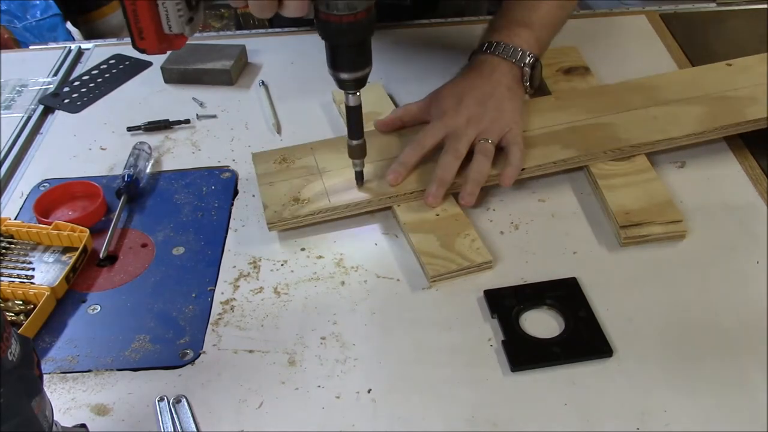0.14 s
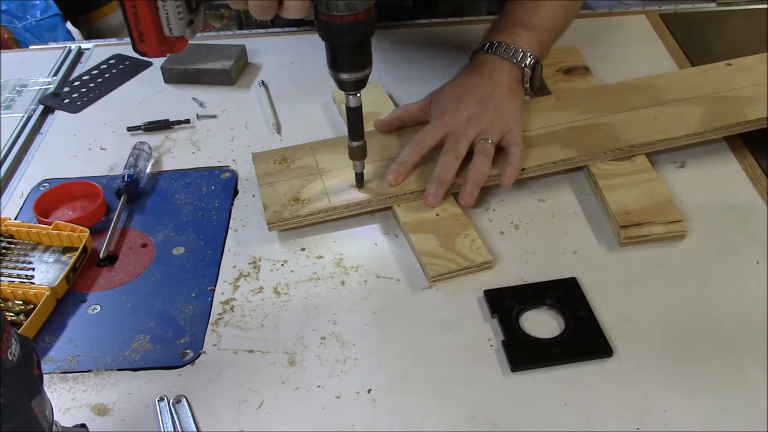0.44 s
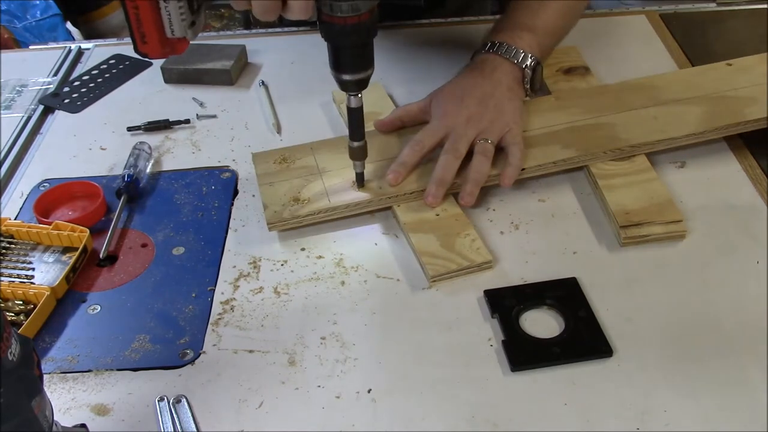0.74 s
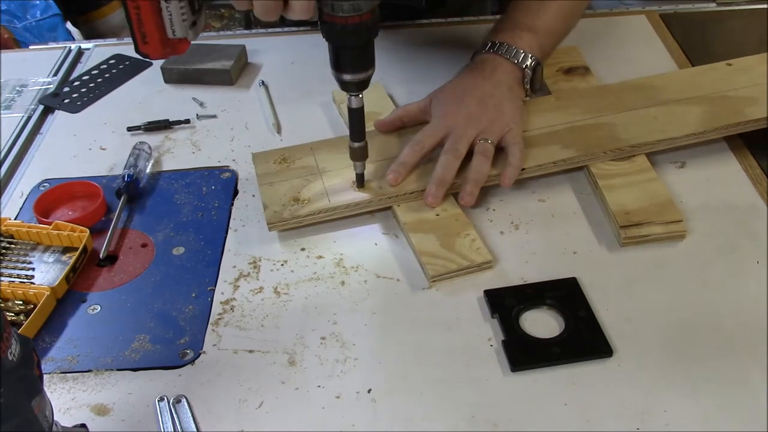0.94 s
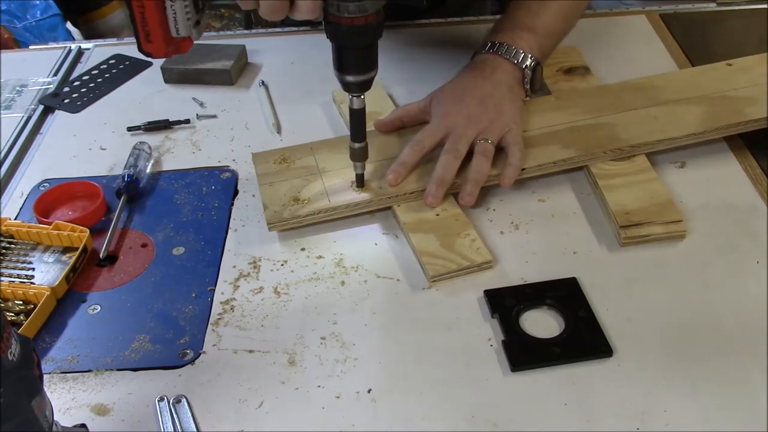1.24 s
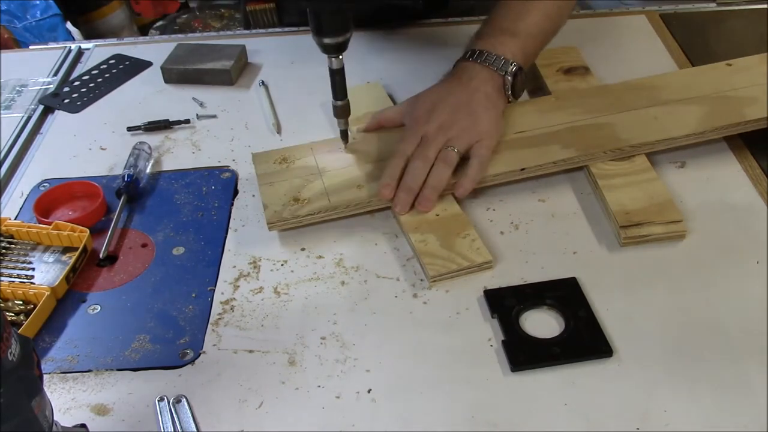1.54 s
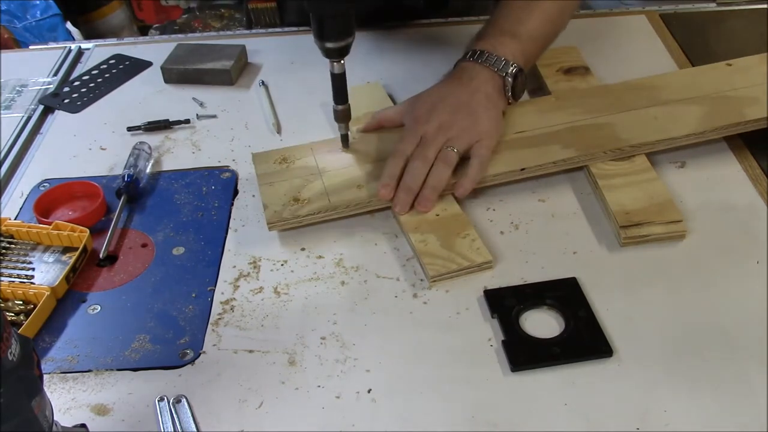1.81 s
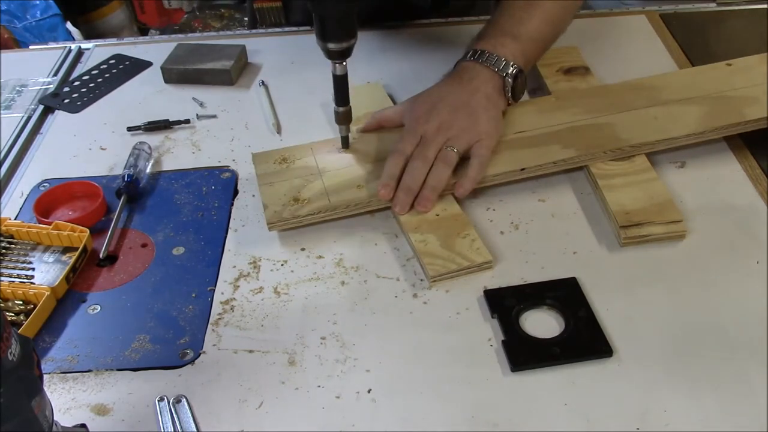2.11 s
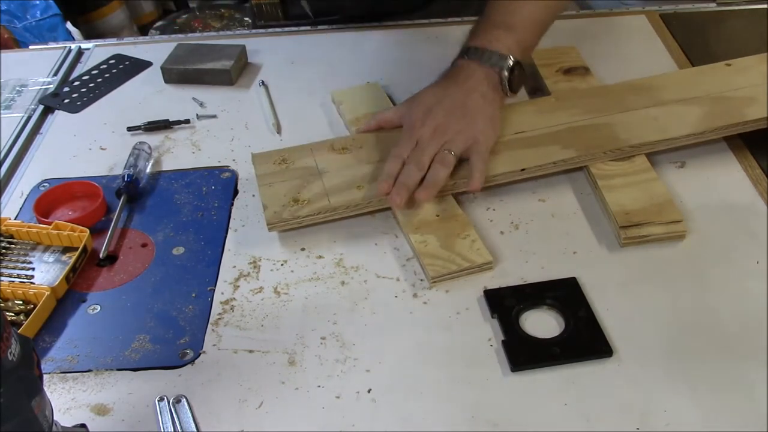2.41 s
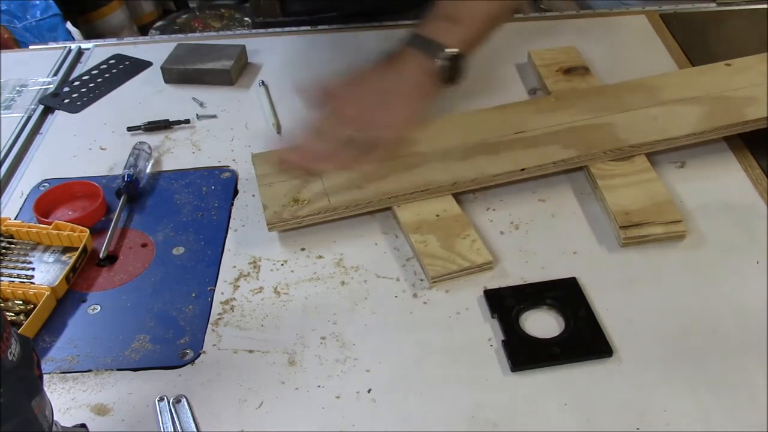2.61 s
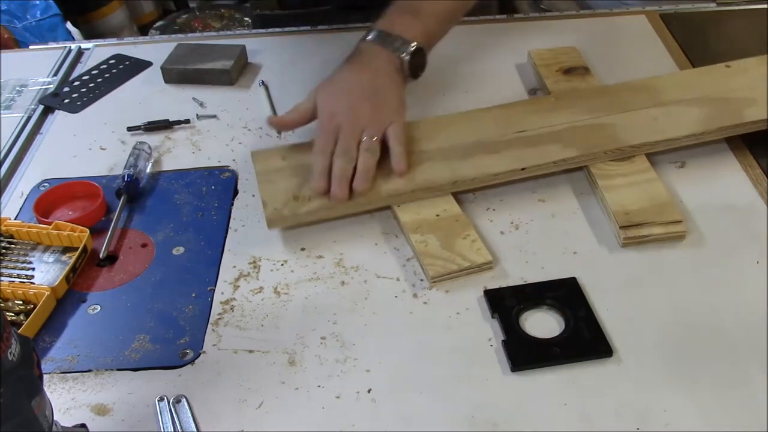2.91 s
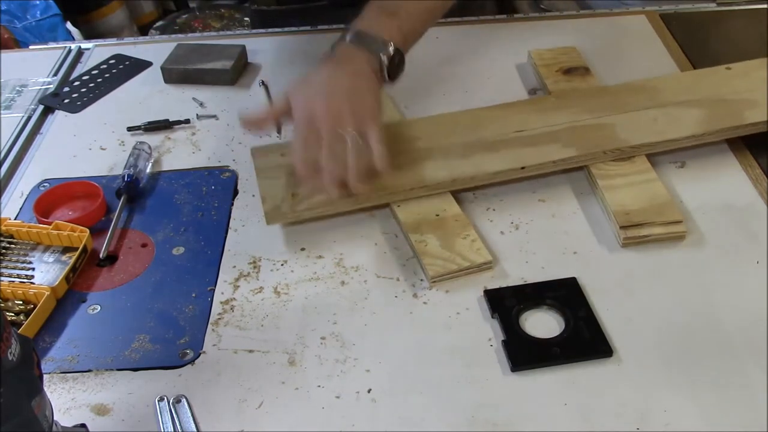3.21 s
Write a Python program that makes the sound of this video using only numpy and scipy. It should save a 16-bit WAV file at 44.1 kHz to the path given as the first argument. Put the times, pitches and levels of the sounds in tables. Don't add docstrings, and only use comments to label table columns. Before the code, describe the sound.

A cordless drill whines close by, bogging slightly as it cuts wood, stops with a chirp, and abruptly runs again. Then a board slides, is brushed by hand and knocks on a bench in a reverberant garage.

```python
import sys
import numpy as np
from scipy import signal
from scipy.fft import rfft, irfft, next_fast_len
from scipy.io import wavfile
from scipy.ndimage import uniform_filter1d, map_coordinates

SR = 44100
rng = np.random.default_rng(int(sys.argv[2]) if len(sys.argv) > 2 else 0)


def gain_from_decibels(decibels):
    exponent = np.asarray(decibels, float) / 20
    return 10 ** exponent


def log_audio(samples):
    frames = np.atleast_2d(samples).T
    limited = np.clip(frames, -1, 1)
    pcm = np.round(limited * 32767).astype(np.int16)
    wavfile.write(sys.argv[1], SR, pcm)


N = 147735


def unit(x):
    return x / np.sqrt(np.mean(x ** 2) + 1e-20)


def along(points, hz):
    f, v = np.transpose(points)
    return np.interp(np.log(hz + 1), np.log(f + 1), v)


def wobble(rate_hz):
    knots = rng.standard_normal(int(N * rate_hz / SR) + 4)
    return map_coordinates(knots, [np.arange(N) * rate_hz / SR])


def filtered(x, response):
    m = next_fast_len(N + SR // 2)
    return irfft(rfft(x, m) * response(np.fft.rfftfreq(m, 1 / SR)), m)[..., :N]


def peaks(table):
    def response(f):
        return sum((-1) ** k * gain_from_decibels(db) * 1j * f * width / (hz * hz - f * f + 1j * f * width)
                   for k, (hz, width, db) in enumerate(table))
    return response


def above(x, hz):
    return signal.sosfilt(signal.butter(4, hz, "high", fs=SR, output="sos"), x)


def struck(hits, modes, attack_s, crack_db=-99):
    out, t = np.zeros(N + SR), np.arange(SR // 4) / SR
    for s, db in hits:
        ring = sum(gain_from_decibels(level + rng.normal(0, 1.5) - 60 * t / t60) * np.sin(2 * np.pi * hz * t)
                   for hz, level, t60 in modes)
        crack = gain_from_decibels(crack_db - 60 * t / 0.0076) * rng.standard_normal(len(t))
        out[round(s * SR):][:len(t)] += gain_from_decibels(db) * (ring * (1 - np.exp(-t / attack_s)) + crack)
    return out[:N]


SAG, SAG_S, JITTER_HZ = .07, .014, 0.83
STRAIN_HZ, STRAIN_SHAKE = 1272.4, .15


def shaft_speed(set_hz, stop_s):
    sag = SAG * np.clip(1 + (np.arange(N) / SR - stop_s) / SAG_S, 0, 1)
    speed_hz = uniform_filter1d(set_hz, size=1800) * (1 - sag) + JITTER_HZ * wobble(60)
    return speed_hz + STRAIN_SHAKE * np.clip(STRAIN_HZ - set_hz, 0, None) * wobble(45)


SHAFT_ORDERS = [3, 4, 5, 8, 9, 10, 10.17, 11.8, 12, 20, 24, 28, 31.8, 36, 39.7, 40, 41, 44, 45, 46]
# level/dB, change where bench echo meets direct sound/dB, growth/(dB per dB load), flutter/dB
WHINE_ORDERS = [(-70.5, -0.5, 1, 3), (-51.5, -7, -0.1022, 1.32), (-64.5, 0.5, 2.5, 4),
                (-44, -2.5, -0.0229, 2), (-53.5, 0.5, 2.24, -1.5), (-56, 1, -0.22, 3), (-61, 0, 1.53, 7.5),
                (-61, -0.5, 0.5, 3.5), (-48, 2, 0.38, 1.63), (-55.5, 1.47, 0.1, 1.5),
                (-63.5, 0.2, -0.6, 4.5), (-60, 2.82, 0.25, 5), (-57.5, -1.02, 0.35, 4),
                (-65.5, 0.27, 1.04, 1.5), (-61, -9, 2.9, -1), (-45.5, -6.5, 0.32, 3), (-64.5, -4.4, 0, 2),
                (-61, 0.52, 5.26, 4), (-62.5, 2.65, -0.35, -0.5), (-63, 2.4, 4.28, -1)]
ECHO_HZ, ECHO_WIDE_HZ, FLUTTER_RATE_HZ = 1283.9, 13.56, 85
DRIFT_DB, DRIFT_RATE_HZ, GRIP_TOP_ORDER = 0.793, 14, 8.5
BLUR, BLUR_SHARE = 0.0051, .7
BOG_HZ, BOG_DB_PER_HZ, WHINE_ENDS_S = 1262.1, 0.57, 0.0088


def gear_whine(speed_hz, turns, load_db, grip_db, stop_s):
    t = np.arange(N) / SR
    shake = BLUR_SHARE * wobble(250)
    echo = np.exp(-((speed_hz - ECHO_HZ) / ECHO_WIDE_HZ) ** 2) * np.clip((load_db + 54.5) / 6, 0, 1)
    whine = np.zeros(N)
    for order, (db, echo_db, grows, flutter_db) in zip(SHAFT_ORDERS, WHINE_ORDERS):
        level_db = db + 2.5 + (order < GRIP_TOP_ORDER) * grip_db + DRIFT_DB * wobble(DRIFT_RATE_HZ)
        level_db = level_db + echo_db * echo + grows * (load_db + 44)
        level_db = level_db + flutter_db * wobble(FLUTTER_RATE_HZ)
        phase = 2 * np.pi * (order * turns / 4 + rng.random()) + BLUR * order * flutter_db * shake
        whine += gain_from_decibels(level_db) * np.sin(phase)
    bog_db = BOG_DB_PER_HZ * np.clip(BOG_HZ - speed_hz, 0, None) * (t < stop_s - SAG_S)
    return whine * gain_from_decibels(-bog_db) * np.clip((stop_s - t) / WHINE_ENDS_S - .5, 0, 1)


# f/Hz, density/(dB per Hz)
FAN_SPECTRUM = [(180, -33.5), (300, -35), (1190, -11.5), (1290, -8), (1770, -23.5), (2550, -7), (4870, -12),
                (6670, -6), (15800, -12.5)]
# f/Hz, width/Hz, level/dB
CASING_MODES = [(6600, 1100, -1.5), (8580, 727, -2), (14340, 3070, 4.5)]


def fan_rush(gate):
    return unit(filtered(gate * rng.standard_normal(N),
                         lambda f: gain_from_decibels(along(FAN_SPECTRUM, f)) * (1 + np.abs(peaks(CASING_MODES)(f)))))


# f/Hz, width/Hz, level/dB
GEAR_MODES = [(1520, 466, -10), (2772, 490, -3), (3125, 402, 2.5), (3835, 1162, -5)]


def gear_grind(gate):
    rough = gate * rng.standard_normal(N) * gain_from_decibels(1.19 * wobble(90))
    return unit(filtered(rough, lambda f: peaks(GEAR_MODES)(f) ** 2))


GEARING, FLUTE_HZ, FLUTE_WIDE_HZ, BITE_SCATTER_DB, SHAVING = 27, 574, 163, 4.5, 1


def flute_chatter(turns):
    bites = np.diff(np.floor(turns / GEARING), prepend=0) * gain_from_decibels(BITE_SCATTER_DB * rng.standard_normal(N))
    cut = unit(bites) + SHAVING * rng.standard_normal(N)
    return unit(filtered(cut, lambda f: peaks([(FLUTE_HZ, FLUTE_WIDE_HZ, 0)])(f) ** 2))


BRAKE_FROM_HZ, BRAKE_TO_HZ, LUMP_S = 5500, 2200, .0035


def brake_chirp(braking, rush, grind):
    t = np.arange(N) / SR
    end_s, brake_s, brake_db, lumpy = braking
    u = (t - end_s) / brake_s + 1
    sweep = 2 * np.pi * brake_s * (BRAKE_FROM_HZ * u + (BRAKE_TO_HZ - BRAKE_FROM_HZ) * u * u / 2)
    lumps = 1 - np.clip(lumpy, 0, 1) * np.sin(np.pi * (t - end_s + 0.00295) / LUMP_S) ** 2
    swell = np.sin(np.pi * np.clip(u, 0, 1) ** 2)
    return gain_from_decibels(brake_db) * lumps * swell * (np.sin(sweep) + .2 * rush + .25 * grind)


GATED, RUSH_DB, FLUTE_DB, IDLE_HZ, IDLE_GROWS = 0.153, -40.5, -67, 2244, 0.29
COAST_DB, COAST_T60_S = -43.5, 0.083


def drill(rows, stop_s, braking):
    t = np.arange(N) / SR
    s, hz, load, grip = np.transpose(rows)
    load_db = np.interp(t, s, load)
    speed_hz = shaft_speed(np.interp(t, s, hz), stop_s)
    turns = np.cumsum(speed_hz) / SR
    whine = gear_whine(speed_hz, turns, load_db, np.interp(t, s, grip), stop_s)
    gate = 1 + GATED * np.cos(2 * np.pi * turns / 4)
    rush, grind = fan_rush(gate), gear_grind(gate)
    brake = brake_chirp(braking, rush, grind)
    running = np.clip((stop_s - t) / .004, 0, 1)
    chatter_db = FLUTE_DB + 0.42 * (load_db + 48.5)
    cutting = gain_from_decibels(load_db - 2.0) * grind + gain_from_decibels(chatter_db) * flute_chatter(turns)
    coast_db = COAST_DB - 60 * np.abs(t - stop_s) / COAST_T60_S + 3.3 * wobble(160)
    coast = gain_from_decibels(coast_db) * (1 - running) * grind
    low_rush = rush - filtered(rush, lambda f: f > IDLE_HZ)
    rush = rush + (gain_from_decibels(IDLE_GROWS * (load_db + 43.5)) - 1) * low_rush
    return whine, running * (gain_from_decibels(RUSH_DB + 0.34 * wobble(7.88)) * rush + cutting) + brake + coast


# t/s, peak level/dB
BIT_TOUCHES = [
    (1.389, -41.5),
    (1.526, -43),
    (2.361, -31.5),
]
# t/s, level/dB
GEAR_RATTLES = [(1.4385, -34), (1.442, -32), (1.4575, -43.5), (1.472, -59.5), (2.411, -32.5),
                (2.419, -42.5), (2.432, -41), (2.464, -47)]


def clicks():
    touches = struck(BIT_TOUCHES, [(FLUTE_HZ, 0, .045), (500, -5, .04), (800, -12, .03)], 0.006)
    gear_modes = [(3320, -13.5, .012), (2437, 0, 0.0195), (14900, -1.5, 0.0157)]
    return touches + struck(GEAR_RATTLES, gear_modes, 0.0004, crack_db=-19)


# t/s, effort level/dB
STROKE_EFFORTS = [
    [(2.469, -49), (2.51, -45), (2.55, -41.5), (2.625, -40), (2.645, -36.5), (2.664, -45), (2.686, -40),
     (2.697, -49)],
    [(2.741, -61.5), (2.748, -50.5), (2.762, -58), (2.788, -50.5), (2.8, -65)],
    [(2.936, -53), (2.955, -40), (2.972, -34), (3.0, -33.5), (3.033, -35.5), (3.048, -43.5)],
    [(3.246, -73), (3.252, -39), (3.284, -33.5), (3.295, -28), (3.338, -33), (3.35, -29.5)],
]
# hiss level/dB, bench weight level/dB
STROKE_TONES = [(6.5, -39.5), (6.5, -11), (3.5, -9.5), (2.5, -4)]
# f/Hz, density/(dB per Hz)
RUB_SPECTRUM = [(120, -45.5), (200, -31), (788, -11), (999, -10.5), (1220, -9.5), (1930, -5), (2890, -4),
                (4390, -9), (15800, -28.5)]
# f/Hz, width/Hz, level/dB
BOARD_MODES = [(1050, 178, 0.5), (1740, 34, -28), (3253, 37, -2.5), (3698, 92, 4.5), (4516, 274, 2.5),
               (5849, 150, 2.5)]
# f/Hz, width/Hz, level/dB
DRAG_MODES = [(299.6, 136, -1), (406, 130, 1), (581, 442, -2.5)]
BRIGHT_GROWS, BRIGHT_HZ, GRIT_DB, GRIT_RATE_HZ = 0.4, 6630, 1, 2500


def strokes():
    t = np.arange(N) / SR
    grit = rng.standard_normal(N) * gain_from_decibels(GRIT_DB * wobble(GRIT_RATE_HZ) + 0.99 * wobble(120))
    rub = unit(filtered(grit, lambda f: gain_from_decibels(along(RUB_SPECTRUM, f))
                        * (1 + 1.265 * np.abs(peaks(BOARD_MODES)(f)))))
    bright = filtered(rub, lambda f: 1 / (1 + (BRIGHT_HZ / (f + 1)) ** 6))
    drag = unit(filtered(rng.standard_normal(N) * gain_from_decibels(2.52 * wobble(120)), peaks(DRAG_MODES)))
    out = np.zeros(N)
    for rows, (hiss_db, weight_db) in zip(STROKE_EFFORTS, STROKE_TONES):
        effort_db = np.interp(t, *np.transpose(rows), left=-120, right=-120)
        bright_db = hiss_db + BRIGHT_GROWS * (effort_db - np.max(effort_db))
        out += gain_from_decibels(effort_db) * (rub - bright + gain_from_decibels(bright_db) * bright + gain_from_decibels(weight_db) * drag)
    return out


# t/s, body level/dB, body f/Hz, edge level/dB
BOARD_KNOCKS = [(2.872, -42.5, 1650, -44.5), (2.874, -40.5, 983, -51), (2.893, -52, 2080, -42.5),
                (2.927, -24, 691, -47), (2.93, -28.5, 371, -70), (2.953, -20.5, 931.5, -55),
                (2.991, -24.5, 990, -54.5), (3.019, -33.5, 674, -31.5), (3.027, -36, 1111, -30),
                (3.163, -43.5, 822, -57.5), (3.257, -27.5, 1042, -45.5), (3.274, -23.5, 1066, -45.5),
                (3.288, -9.5, 733, -26), (3.2914, -16.5, 1108, -12.5), (3.298, -17.5, 909, -35),
                (3.304, -19.5, 419, -27.5), (3.316, -22.5, 397, -24.5), (3.327, -35, 607, -31)]
# f/Hz, level/dB, t60/s
EDGE_MODES = [(1916, 0.5, 0.0165), (3250, -14, 0.017), (3693, -8.5, 0.0244), (4572, -6, 0.0408),
              (4950, -5.5, 0.04), (5780, -1.5, 0.0228)]
BODY_T60_S, BODY_RISE_S, EDGE_LATE_S, EDGE_TOP_HZ = 0.02247, 0.001013, 0.0022, 6270


def knocks():
    body = sum(struck([(s, db)], [(hz, 0, BODY_T60_S)], BODY_RISE_S) for s, db, hz, _ in BOARD_KNOCKS)
    edge_hits = [(s + EDGE_LATE_S, db) for s, _, _, db in BOARD_KNOCKS]
    edge = struck(edge_hits, EDGE_MODES, 0.00035, crack_db=-2.5)
    return body + filtered(edge, lambda f: 1 / (1 + 1j * f / EDGE_TOP_HZ) ** 2)


# t/s, level/dB
CHIP_FLICKS = [(3.018, -39), (3.031, -39), (3.035, -44.5), (3.346, -31.5)]
# f/Hz, level/dB, t60/s
CHIP_MODES = [(10030, -0.5, 0.0116), (10770, 3.5, 0.0134), (11500, -0.5, 0.0105), (13600, -3.5, .008)]


def flicks():
    return struck(CHIP_FLICKS, CHIP_MODES, 0.00057, crack_db=-15.5)


# t/s, level/dB
BENCH_THUMPS = [(2.882, -45), (2.905, -48.5), (2.93, -36), (2.965, -53.5), (3.04, -46.5), (3.095, -50.5),
                (3.12, -53.5), (3.175, -50.5), (3.255, -34), (3.285, -28.5), (3.305, -37.5)]
# f/Hz, level/dB, t60/s
BENCH_MODES = [(135.8, 5.5, 0.195), (160.1, 2.5, 0.1255), (248.5, -1.5, 0.112), (352.4, 5.5, 0.0236)]


def thumps():
    return struck(BENCH_THUMPS, BENCH_MODES, 0.0114)


# f/Hz, t60/s
ROOM_DECAY = [(200, 0.995), (2000, 0.739), (6000, 0.413), (14000, 0.2483)]


def garage(x):
    hz, t, z = signal.stft(rng.standard_normal(SR // 2), SR, nperseg=256)
    decay = gain_from_decibels(-60 * t / along(ROOM_DECAY, hz)[:, None])
    tail = signal.istft(z * decay, SR, nperseg=256)[1]
    return signal.fftconvolve(np.pad(x, (300, 0)), tail / np.linalg.norm(tail))[:N]


# f/Hz, width/Hz, level/dB
RING_MODES = [(1073.7, 83, 7), (1739, 55, 9), (2080, 75, 4)]
RING_FROM_S = 2.83


def hand_tail(hand):
    tail = above(garage(hand), 404)
    return tail + filtered(tail * (np.arange(N) / SR > RING_FROM_S), peaks(RING_MODES))


# f/Hz, density/(dB per Hz)
HUSH_SPECTRUM = [(25, -9.5), (130, -6), (500, -9), (3000, -6.5), (8000, -20.5), (15800, -31.5)]
HUSH_DB = -59.5


def room_hush():
    return gain_from_decibels(HUSH_DB) * unit(filtered(rng.standard_normal(N), lambda f: gain_from_decibels(along(HUSH_SPECTRUM, f))))


# t/s, four times shaft speed f/Hz, cutting load level/dB, grip on low whine level/dB
HOLE_COURSES = [
    [(0, 1316, -49.5, 3), (.19, 1310, -47, 0), (.49, 1296, -44, -1.5), (.9, 1286, -43.5, -1),
     (1.1, 1270, -42.5, -2), (1.27, 1262, -42.5, 1), (1.335, 1268, -42.5, 2), (1.36, 1284, -56.5, -2.5),
     (1.41, 1305, -65, -2.5)],
    [(1.503, 1292, -53.5, 0), (1.6, 1308, -47, 0), (1.85, 1289, -43.5, -3), (2.0, 1278, -43.5, -0.5),
     (2.15, 1252, -41.5, -1.5), (2.25, 1257, -41.5, -1.5), (2.3, 1278, -49.5, -1), (2.345, 1284, -60.5, -6),
     (2.405, 1305, -59, -3.5)],
]
# chirp end t/s, length/s, level/dB, lumpiness 0-1
BRAKINGS = [
    (1.4453, 0.0083, -29, .7),
    (2.418, 0.011, -30.5, 0.25),
]
# start, motor stop, scene change [t/s]
HOLE_STARTS_S = [0, 1.5012]
MOTOR_STOPS_S = [1.444, 2.418]
CHANGES_S = [1.5012, 2.469]
WET_DB, DRILL_WET_DB, EARLY_HUSH_DB, SIDE_HUSH_DB, SPLICE_DB = -8.5, -12, -17.5, -88, -55
DRILL_LOW_HZ, WET_LOW_HZ, HAND_LOW_HZ = 298, 1980, 82


def scene():
    t, small, hush = np.arange(N) / SR, clicks(), room_hush()
    by_hand = t >= CHANGES_S[1]
    mid = gain_from_decibels(EARLY_HUSH_DB) * hush * (t < CHANGES_S[1])
    for rows, start, stop, change, braking in zip(HOLE_COURSES, HOLE_STARTS_S, MOTOR_STOPS_S,
                                                  CHANGES_S, BRAKINGS):
        whine, noise = drill(rows, stop, braking)
        wet = gain_from_decibels(DRILL_WET_DB) * above(garage(noise), WET_LOW_HZ)
        mid = mid + above(whine + small + noise + wet, DRILL_LOW_HZ) * (t >= start) * (t < change)
    mid = mid + gain_from_decibels(SPLICE_DB - 60 * np.abs(t - CHANGES_S[0]) / 0.0029) * (t >= CHANGES_S[0])
    hand = above(strokes() + knocks() + flicks() + thumps(), HAND_LOW_HZ)
    mid = mid + (hand + gain_from_decibels(WET_DB - 2.0) * hand_tail(hand) + hush) * by_hand
    side_noise = unit(filtered(rng.standard_normal(N), lambda f: 1 + 4000 / (f + 60)))
    side = gain_from_decibels(SIDE_HUSH_DB) * side_noise * by_hand
    return np.array([mid + side, mid - side])


# t/s, low f/Hz, high f/Hz
WIDE_BANDS = [(.232, 8200, 9700), (.232, 10300, 11800), (.697, 12400, 14500), (.813, 6900, 9000),
              (.906, 11700, 13200), (.906, 13800, 15200), (1.208, 8200, 9700), (1.3, 4600, 5700),
              (1.626, 5100, 6300), (1.626, 8200, 9700), (1.626, 10300, 13200), (1.626, 13800, 15200)]
FILL_S, FILL_DB = 0.045, -3.5


def widened(dry):
    t, hz = np.arange(N) / SR, np.fft.rfftfreq(2 ** 18, 1 / SR)
    other = rfft(np.roll(dry.mean(axis=0), SR // 10), 2 ** 18)
    fill = np.zeros(N)
    for s, low_hz, high_hz in WIDE_BANDS:
        band = irfft(other * (hz > low_hz) * (hz < high_hz))[:N]
        fill += band * np.cos(np.pi * np.clip((t - s) / FILL_S, -.5, .5))
    return dry + gain_from_decibels(FILL_DB) * np.array([fill, -fill])


def top_cut(x):
    return signal.sosfilt(signal.butter(12, 16530, fs=SR, output="sos"), x)


def record(dry):
    top_hz = 15780
    mix = filtered(widened(dry), lambda f: f < top_hz)
    return top_cut(mix)


dry = scene()
out = record(dry)
log_audio(out)
```